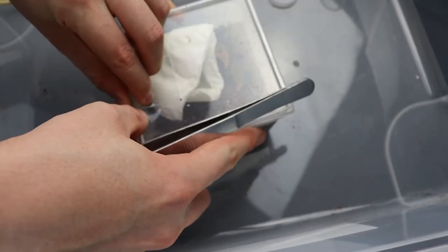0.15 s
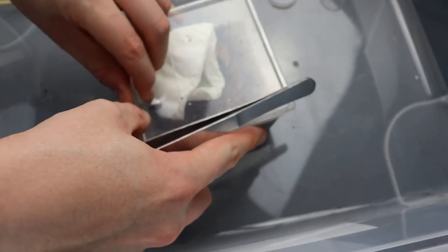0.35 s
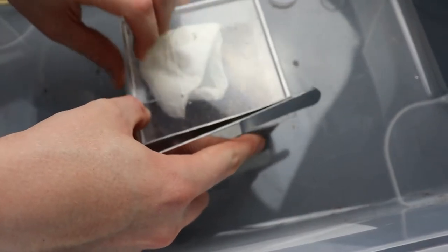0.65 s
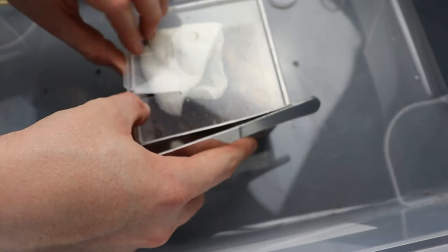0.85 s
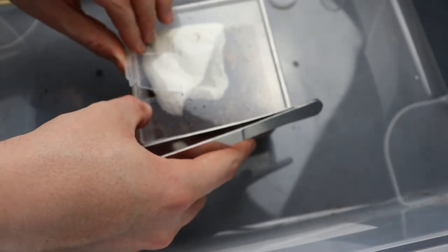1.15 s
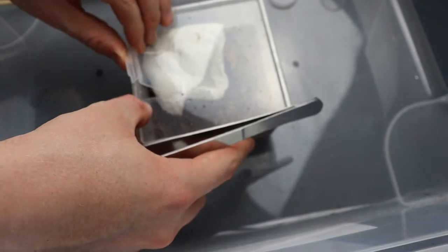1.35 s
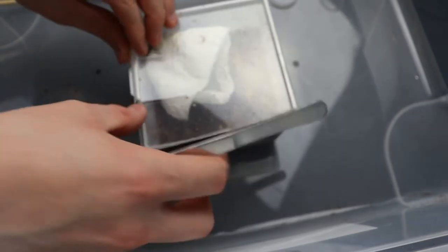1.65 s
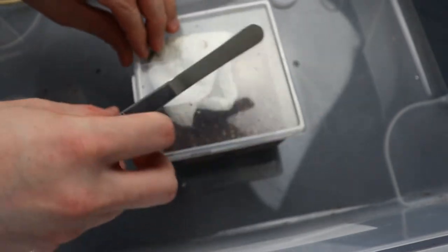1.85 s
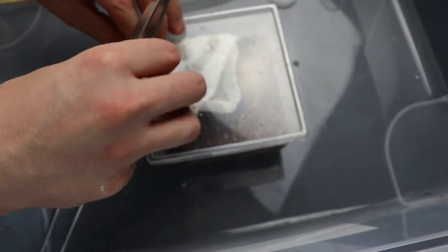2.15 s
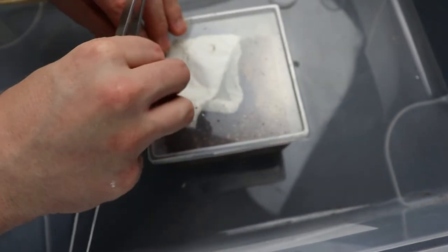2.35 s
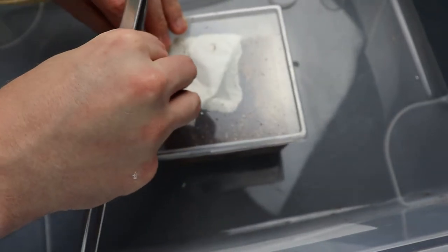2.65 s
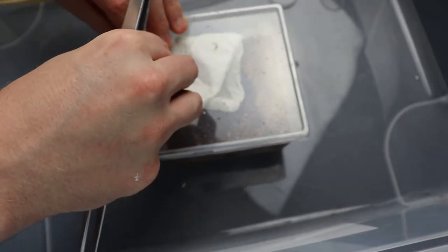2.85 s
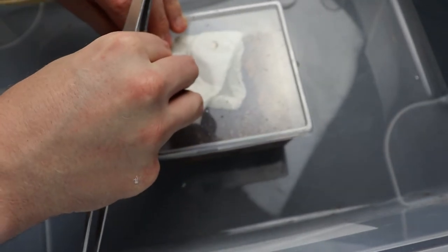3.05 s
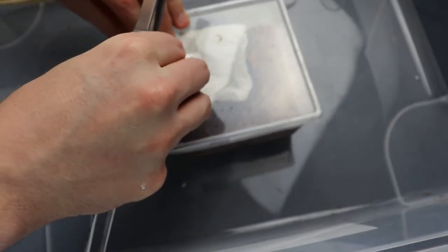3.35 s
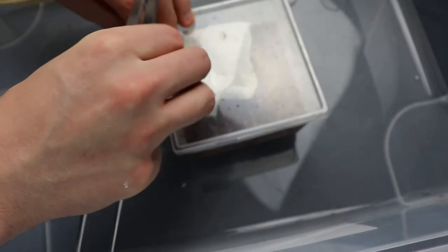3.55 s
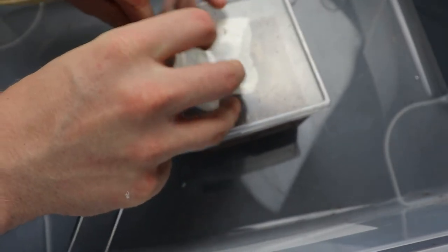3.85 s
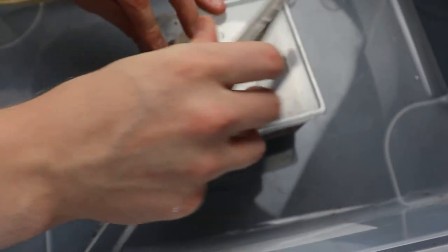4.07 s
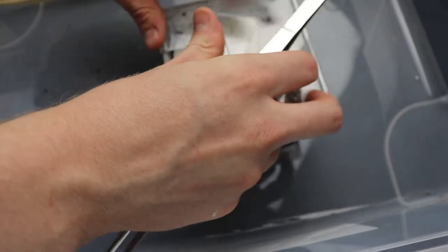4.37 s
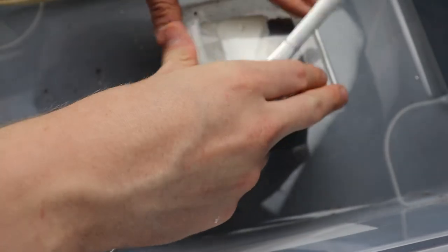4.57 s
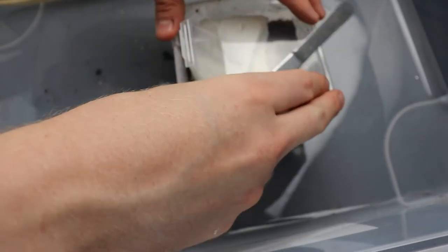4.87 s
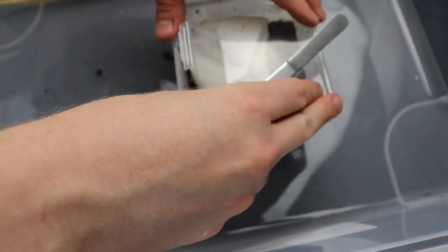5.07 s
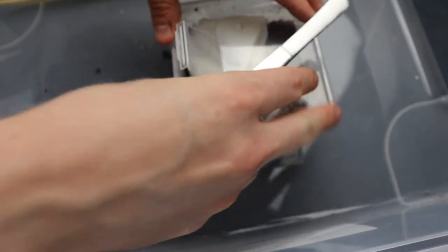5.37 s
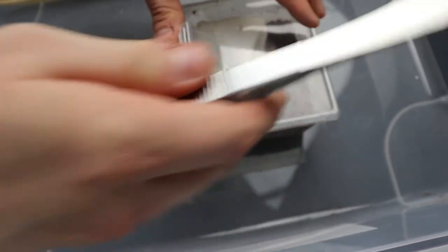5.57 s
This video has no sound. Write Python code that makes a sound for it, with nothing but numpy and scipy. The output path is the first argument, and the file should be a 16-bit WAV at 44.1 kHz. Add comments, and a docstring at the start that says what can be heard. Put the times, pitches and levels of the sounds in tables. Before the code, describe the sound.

Metal tweezers and fingers pry and snap at a small plastic box in a big plastic tub, with sharp cracks, knocks and faint rubbing.

```python
"""Quiet room, large plastic tub: fingers and steel tweezers pry and snap the lid of a small plastic box in it.
Blows are noise cracks, panel clatter and modal ringing, shaped by a colour per blow; pushes thud the tub.
Rubbing is clumped random slips through the panel modes over a rumble; scuffs are swells of coloured noise.
A lid slip swells as dense clicks; whistles are short sagging tones; floor noise lies under everything.
The two-port microphone is close and clips on the hardest blows."""
import sys
import numpy as np
from scipy import signal
from scipy.fft import rfft, irfft, next_fast_len
from scipy.io import wavfile
from scipy.ndimage import uniform_filter1d

SR = 44100
rng = np.random.default_rng(int(sys.argv[2]) if len(sys.argv) > 2 else 0)


def transcribe(u):
    """Save the signal u as a 16-bit wav file named by the first command-line argument.

    u: samples, shape (n,) or (channels, n), limited to [-1, 1]; the rate is SR.
    q: integer samples, one column per channel.
    """
    v = np.clip(np.atleast_2d(u).T, -1, 1)
    q = np.round(v * 32767).astype(np.int16)
    wavfile.write(sys.argv[1], SR, q)


def how_loud(loudness_db):
    """Turn decibels into a plain amplitude multiplier (0 dB gives 1, 20 dB gives 10)."""
    steps = np.asarray(loudness_db, float) / 20
    return 10 ** steps


N = 251811
PADDED_N = next_fast_len(N + 64, real=True)

# room and microphone noise: f/Hz, relative spectral level/dB
FLOOR_SPECTRUM = [(15, -43), (25, 4.5), (59, -11), (130, 0), (190, -8), (263, -8), (309, -18.5),
                  (575, -11.5), (734, -21), (1480, -20.5), (8590, -31.5), (13600, -30.5), (16000, -35.5)]
# left-right correlation of diffuse sound: f/Hz, correlation/1
DIFFUSE_LIKENESS = [(60, 1), (180, 0.93), (550, 0.44), (1650, 0.21), (4970, -0.42), (15000, 0.48)]
# left-right correlation of near sound: f/Hz, correlation/1
NEAR_LIKENESS = [(150, 0.99), (700, 0.78), (3000, 0.47), (9000, 0.54)]
# port balance: f/Hz, left minus right/dB
PORT_TILT = [(60, -3.5), (300, -2.5), (1000, -4), (3000, -5.5), (14000, -4.5)]
# decay of tub walls and room: f/Hz, t60/s
ROOM_T60 = [(120, 0.12), (300, 0.3), (700, 0.3), (2000, 0.18), (5000, 0.15), (13000, 0.11)]
# work of the hands on the box: t/s, level/dB
HAND_EFFORT = [(0.0, -34), (0.19, -55.5), (0.35, -64), (0.62, -50), (0.94, -44.5), (1.19, -59), (1.46, -72),
               (1.62, -55), (2.0, -63), (2.4, -54.5), (2.72, -60.5), (2.94, -65.5), (3.34, -50),
               (3.7, -57.5), (3.86, -48), (4.18, -60), (4.69, -49.5), (5.2, -63), (5.71, -49.5)]
# rubbing hiss: f/Hz, relative spectral level/dB
RUB_SPECTRUM = [(240, -33), (400, -0.5), (1510, -2), (2710, -8), (3750, -6), (6540, -9.5), (7510, -6),
                (16000, -53)]
# tub floor rumble resonances: f/Hz, width/Hz, level per pass/dB
RUMBLE_MODES = [(73.5, 40, -15.5), (114, 25, 1), (250, 290, -5.5), (328, 75, -12.5)]
# modes of box and tub: f/Hz, relative level/dB, t60/s
BODY_MODES = [(55, -19.5, 0.09), (87.5, -3.5, 0.089), (111, -13.5, 0.26), (129.6, -3.5, 0.22),
              (258.4, 2.5, 0.064), (288, 4, 0.076), (352, 3.5, 0.07), (414, -8.5, 0.2), (466.4, -7.5, 0.21),
              (562, -3, 0.066), (642.5, -2.5, 0.084), (730, -1, 0.0077), (823.5, -7, 0.11),
              (928, 0.5, 0.034), (1110, 2.5, 0.061), (1347, 5, 0.028), (1524, 7.5, 0.025),
              (1726, -3.5, 0.046), (1848, 11.5, 0.0087), (2063, -4.5, 0.028), (2380, 2, 0.01),
              (2944, -2, 0.047), (3745, 10.5, 0.0057), (5330, 7.5, 0.019), (6530, 10, 0.0087)]
# modes of the tweezers: f/Hz, relative level/dB, t60/s
STEEL_MODES = [(5350, -3, .07), (6460, -2, .08), (6840, 0, .16), (6900, -2, .14), (7330, -3, .08),
               (9280, 0, .07), (9560, -3, .08), (9960, -3, .12), (11180, -4, .06)]
# fingers scuffing the lid: t/s, length/s, level/dB, tick near 9 kHz/dB
SCUFFS_TABLE = [(0, 0.032, -40, -9), (0.442, 0.026, -45, -9), (0.557, 0.067, -55.5, -9),
                (1.072, 0.023, -50, -10.5), (1.113, 0.1, -49, -18), (1.236, .06, -53, -3),
                (1.482, 0.06, -49.5, -11), (1.553, 0.062, -48, -12), (1.631, 0.068, -53, -6),
                (1.707, 0.045, -48.5, -12), (1.748, 0.055, -48.5, -9), (2.161, 0.0406, -58.5, -30),
                (2.19, 0.023, -52.5, -3), (2.63, 0.099, -52.5, -39), (3.29, 0.13, -50.5, -3.5),
                (3.499, 0.023, -52.5, -24.5), (3.92, 0.07, -59.5, -17), (3.893, 0.036, -48.5, -12.5),
                (4.152, 0.076, -47, -6.5), (4.221, 0.026, -48, -8), (4.308, 0.046, -52, 1),
                (4.532, 0.066, -47.5, -9.5), (4.578, 0.05, -45.5, -27), (4.627, 0.034, -52.5, 4.5),
                (4.657, 0.048, -44, -33.5), (5.414, 0.022, -44.5, -3.5), (5.671, 0.032, -51.5, -7)]
# blows: t/s, relative strength/dB, knock near 600 Hz/dB, tick near 9 kHz/dB, contact decay constant/ms
BLOWS_TABLE = [(0.0406, -25, 14.5, -30.5, 13), (0.0671, -15.5, -9.5, -41.5, 1),
               (0.1427, -3.5, -1.5, -14.5, 1.5), (0.33, -11.5, -11, -22.5, 0.96),
               (0.447, -36.5, -23.5, -20, 2), (0.5377, -24.5, -8, -22.5, 2.3), (0.563, -32, -6, -27, 2.1),
               (0.6418, -34.5, 0.5, -16, 4.1), (0.7057, -5, -17.5, -22.5, 0.5),
               (0.7104, -19.5, 4, -5.5, 4.3), (0.8189, -24, -12, -28.5, 0.49), (0.837, -37, 8, -29, 0.45),
               (0.8936, -2, -7, -15, 4.5), (1.1275, -35.5, 0, -51, 2.1), (1.1527, -41, 5.5, -19, 2.9),
               (1.504, -52, -9, -16.5, 1.09), (1.5436, -35.5, -14.5, -13, 2.3),
               (1.5661, -27.5, -3, -17.5, 0.44), (1.7684, -33, -6, -18.5, 0.51),
               (1.8393, -4.5, -3, -24.5, 1.2), (1.8576, -13.5, 1.5, -33.5, 1.3),
               (1.946, -6.5, -16.5, -20, 1.1), (2.2128, -28, -6, -21, 3.2), (2.3347, -10.5, -33, -24, 0.22),
               (2.3556, -12.5, 2, -19, 4.5), (2.3835, -18, -16.5, -26, 0.72),
               (2.4692, -27.5, -8, -38.5, 5.5), (2.4915, -22.5, -29.5, -13.5, 0.89),
               (2.4999, -6.5, -18, -12, 1), (3.037, -5.5, -17.5, -15, 1.2), (3.2617, -5, -19.5, -5.5, 1.7),
               (3.285, -25.5, -14, -6.5, 2.2), (3.3987, -44, -23, -7, 1.1),
               (3.4183, -23.5, -15.5, -22.5, 3.5), (3.5331, -20, -7, -21, 0.43),
               (3.5635, -6.5, -12, -8.5, 0.73), (3.5789, -10.5, -10.5, -17.5, 4.5),
               (3.6324, -33, 1.5, -14.5, 0.98), (3.7556, -32, -5, -8, 1.5), (3.806, -48.5, -6, 0.5, 0.55),
               (3.8421, -34, -11.5, -25.5, 0.97), (3.8912, -39.5, 10.5, -19, 8),
               (4.0023, -41, -6, -32, 1.5), (4.067, -39.5, -2.5, -37, 1.5), (4.124, -42.5, -1, -22, 1),
               (4.2516, -38.5, 4, -28, 3.5), (4.2827, -50.5, 18.5, -14, 1.9), (4.3099, -31.5, 3, -39, 1.4),
               (4.33, -41.5, 7, -7.5, 1.3), (4.3892, -39, -4, -26, 1.5), (4.4172, -46, -2, -27, 1.5),
               (4.576, -27, 9, -39, 1.4), (4.6702, -24, -4, -42, 8.3), (4.8376, -35.5, -8, -41, 4.5),
               (4.985, -12.5, -6.5, -2, 0.89), (5.3129, -24, -5, -27.5, 1.28), (5.425, -39, 5.5, -7.5, 4.5),
               (5.4808, -38, 0, -3.5, 1.2), (5.503, -39, -17, -15, 1.5), (5.5359, -27.5, -1.5, -42, 0.42),
               (5.6063, -33.5, 4, -44, 1.2), (5.6855, -30.5, 2, -44, 0.77)]
# centres of thump, knock, crack, tick: f/Hz
COLOUR_HZ = [150, 600, 2500, 9000]
# answer of those four to any blow: relative level/dB
COLOUR_DB = [31.1, 14.77, 7.4, 17.26]
# dense clatter of the panels: f/Hz, t60/s
CLATTER_T60 = [(150, 0.046), (600, 0.095), (2500, 0.044), (9000, 0.027)]
# box pushed down on the tub floor: t/s, peak level/dB, push/ms
THUDS_TABLE = [(0.042, -25.5, 1.7), (0.07, -36, 3.4), (.709, -22.5, 3.24), (0.896, -29, 2.6),
               (1.84, -21, 2.5), (1.847, -25.5, 4.7), (1.859, -22, 2.94), (2.355, -22, 4.9),
               (2.359, -31, 2.2), (2.386, -31.5, 5.3), (3.26, -44, 9.3), (3.535, -42.5, 1.6),
               (3.757, -37, 3), (3.845, -37, 2.6), (3.893, -38, 3.6), (4.285, -39, 4.3), (4.504, -43, 4.1),
               (4.569, -30, 11.4), (4.674, -34.5, 3.2), (4.741, -37.5, 3.7), (4.829, -38.5, 5.9),
               (4.99, -20, 0.98), (5.312, -32, 5.2), (5.428, -42, 3.2), (5.539, -36, 4.6),
               (5.609, -39, 6.5), (5.685, -48, 2.2)]
# lid edge resonances: f/Hz, width/Hz, level per pass/dB
SLIP_MODES = [(2640, 1500, 0.5), (4630, 2200, -13.5), (7250, 6000, -4)]
# faint whistles: t/s, length/s, starting f/Hz, peak level/dB
WHISTLES_TABLE = [(1.34, .035, 5000, -60), (1.375, .025, 4900, -61), (1.412, .035, 4200, -55),
                  (2.105, .03, 5300, -61), (2.17, .03, 4200, -58), (3.91, .085, 1570, -58),
                  (3.985, .035, 4350, -63)]


def evened(x):
    """Scales to rms 1."""
    return x / np.sqrt(np.mean(x ** 2) + 1e-20)


def smooth_noise(size, span):
    """Moving average of white noise, at rms 1."""
    return evened(uniform_filter1d(rng.standard_normal(size), span))


def read(points, hz):
    """Interpolates a table on a log-frequency axis."""
    f, value = np.transpose(points)
    return np.interp(np.log(hz + 1), np.log(f + 1), value)


def coloured(x, points):
    """Filters by a spectrum in dB."""
    size = next_fast_len(x.shape[-1], real=True)
    gain = how_loud(read(points, np.fft.rfftfreq(size, 1 / SR)))
    return irfft(rfft(x, size) * gain, size)[..., :x.shape[-1]]


def paired(size, points):
    """Two noises, correlated by frequency as the table says."""
    a, b = rfft(rng.standard_normal((2, size)))
    same = np.clip(read(points, np.fft.rfftfreq(size, 1 / SR)), -1, 1)
    return irfft(np.array([a, same * a + np.sqrt(1 - same ** 2) * b]), size)


def resonate(x, modes):
    """Sum of parallel two-pole resonances."""
    out = np.zeros_like(x)
    for hz, width_hz, db in modes:
        b, a = signal.iirpeak(hz, hz / width_hz, SR)
        out += how_loud(db) * signal.lfilter(b, a, x)
    return out


def ringing(modes, t):
    """One exponentially dying sine per mode."""
    hz, db, t60_s = np.transpose(modes)[:, :, None]
    return how_loud(db - 60 * t / t60_s) * np.sin(2 * np.pi * hz * t)


def decaying(noise, *layers):
    """Decays each noise band by summed power layers: (t60 table, level/dB, build-up/s)."""
    hz, t, z = signal.stft(noise, SR, nperseg=128)
    power = 0
    for t60s, db, build_s in layers:
        fall = how_loud(2 * db - 120 * t / read(t60s, hz)[:, None])
        power = power + fall * (1 - np.exp(-t / build_s)) ** 2
    return signal.istft(z * np.sqrt(power), SR, nperseg=128)[1][:, :noise.shape[1]]


def floor():
    """Room tone and microphone hiss: coloured noise, most alike in both ports in the bass."""
    level_db = -53.5
    noise = coloured(paired(PADDED_N, DIFFUSE_LIKENESS), FLOOR_SPECTRUM)
    return how_loud(level_db) * evened(noise)[:, :N]


def rubbing():
    """Clumped slips of skin on plastic ring the panels; the tub floor rumbles with the same effort."""
    hiss_db, hiss_share, mean_effort_db = -64.5, 0.77, -55
    slips_per_s = 5000
    clumps = how_loud(6.6 * smooth_noise(N, 700))
    slips = (rng.random(N) < slips_per_s / SR) * rng.standard_normal(N)
    slips = slips * how_loud(1.4 * rng.exponential(1, N)) * clumps
    # width 7 / t60: broader than the freely ringing mode
    panel_modes = [(hz, 7 / t60_s, db) for hz, db, t60_s in BODY_MODES if hz > 400]
    panels = resonate(slips, panel_modes)
    hiss = evened(coloured(evened(slips) + 0.17 * evened(panels), RUB_SPECTRUM))

    t_s, level_db = np.transpose(HAND_EFFORT)
    effort_db = np.interp(np.arange(N) / SR, t_s, level_db)
    lumpy = rng.standard_normal(N) * how_loud(4.5 * smooth_noise(N, 900))
    rumble = evened(resonate(resonate(lumpy, RUMBLE_MODES), RUMBLE_MODES))
    # hiss follows the hands by its share only
    hiss_level_db = hiss_db + hiss_share * (effort_db - mean_effort_db)
    return hiss * how_loud(hiss_level_db) + rumble * how_loud(effort_db)


def room(x):
    """Tub walls and room: convolves the steady sounds with a decaying noise tail."""
    level_db, build_s = -9.5, 0.003
    tail = decaying(paired(10240, DIFFUSE_LIKENESS), (ROOM_T60, 0, build_s))
    tail = tail / np.linalg.norm(tail[0])
    return how_loud(level_db) * signal.fftconvolve(x[None], tail, axes=1)[:, :N]


def scuffs():
    """Fingers scuff the lid: soft swells of grainy coloured noise."""
    out = np.zeros((2, N + 8192))
    for start_s, length_s, db, tick_db in SCUFFS_TABLE:
        size = 2 * round(length_s * SR / 2)
        grain = how_loud(2.5 * smooth_noise(8192, 150))[:size]
        colour = [(150, 14), (600, 1.5), (2500, 0), (9000, tick_db), (16000, tick_db - 3)]
        noise = evened(coloured(paired(8192, NEAR_LIKENESS), colour))[:, :size]
        swell = signal.windows.tukey(size, 0.7)
        out[:, round(start_s * SR):][:, :size] += how_loud(db) * noise * grain * swell
    return out[:, :N]


def blow_filter(thump_db, knock_db, tick_db, hz):
    """Minimum-phase colour of one blow: nothing sounds before the contact."""
    centres = zip(COLOUR_HZ, np.add(COLOUR_DB, [thump_db, knock_db, 0, tick_db]))
    colour = [(40, thump_db), *centres, (16000, tick_db + 10.5)]
    log_gain = np.log(how_loud(read(colour, hz)))
    # each spot on the box has its own broad colour
    humps = uniform_filter1d(uniform_filter1d(rng.standard_normal(len(hz)), 160), 160)
    log_gain += 0.18 * evened(humps)
    circle = np.concatenate([log_gain, log_gain[-2:0:-1]])
    return np.exp(np.conj(signal.hilbert(circle)))[:len(hz)]


def blows():
    """A contact cracks, clatters through the panels, rings the modes and dies away in tub and room."""
    ring_db, steel_db, crack_db, clatter_db, tail_db = -10.5, -14, 10, 3, -10.5
    size, crack_size = 10240, 2048
    out = np.zeros((2, N + size))
    t, hz = np.arange(size) / SR, np.fft.rfftfreq(size, 1 / SR)
    crack_t = t[:crack_size]
    body, steel = ringing(BODY_MODES, t), ringing(STEEL_MODES, t)
    # the low tub floor answers steadily, small panels by the spot struck
    fickle = np.clip(np.transpose(BODY_MODES)[0] / 400, 0, 1)
    for start_s, db, knock_db, tick_db, contact_ms in BLOWS_TABLE:
        # dull and light blows put the larger share into the tub
        thump_db = -30 + 0.97 * knock_db - 0.39 * db

        place = rng.uniform(-0.67, 1, len(BODY_MODES))
        grip = rng.uniform(-0.56, 1, len(STEEL_MODES))
        answer = 1 - fickle + fickle * np.sign(place) * (0.28 + abs(place))
        ring = how_loud(ring_db) * answer @ body
        ring += how_loud(steel_db + 0.6 * tick_db) * grip @ steel  # bright blows are steel on the rim

        rise_s = 0.00006 * how_loud(-0.6 * db)  # light touches are fingertips and set in slowly
        shape = (1 - np.exp(-crack_t / rise_s)) * np.exp(-crack_t * 1000 / max(contact_ms, 0.1))
        crack = np.zeros((2, size))
        crack[:, :crack_size] = how_loud(crack_db) * paired(crack_size, NEAR_LIKENESS) * shape
        crack[:, 0] -= 2.6 * how_loud(0.23 * db)  # one sharp push, larger in hard blows

        clatter = decaying(paired(size, NEAR_LIKENESS),
                           (CLATTER_T60, clatter_db, 0.0008), (ROOM_T60, tail_db, 0.007))
        causal = blow_filter(thump_db, knock_db, tick_db, hz)
        sound = rfft(ring + crack + clatter) * causal
        # the blow's energy is set, its detail is chance
        sound *= np.linalg.norm(causal) / np.linalg.norm(sound[0])
        out[:, round(start_s * SR):][:, :size] += how_loud(db + 16.5) * irfft(sound, size)
    return out[:, :N]


def thuds():
    """A soft sine-squared push rings the body modes from below; longer pushes favour the lowest."""
    out = np.zeros(N + 12000)
    signs = (-1.) ** np.arange(len(BODY_MODES))  # neighbours swing opposite
    answer = signs @ ringing(BODY_MODES, np.arange(11000) / SR)
    for start_s, db, push_ms in THUDS_TABLE:
        push_size = max(round(push_ms * SR / 1000), 3)
        push = np.sin(np.linspace(0, np.pi, push_size)) ** 2
        sound = signal.fftconvolve(answer, push)
        out[round(start_s * SR):][:len(sound)] += how_loud(db) * sound / np.abs(sound).max()
    return out[:N]


def slip():
    """Dense stick-slip clicks swell as the lid edge slides out of its catch, and stop as it comes free."""
    start_s, free_s, onset_s = 0.664, 0.706, 0.008
    peak_db, swell_db_per_s, fall_db_per_s = -28, 306.5, 1402
    clicks_per_s = 5000
    clicks = (rng.random(N) < clicks_per_s / SR) * rng.standard_normal(N)
    t = np.arange(N) / SR
    level_db = peak_db + np.minimum(swell_db_per_s * (t - free_s), -fall_db_per_s * (t - free_s))
    onset = np.clip((t - start_s) / onset_s, 0, 1)
    edge = evened(resonate(resonate(clicks, SLIP_MODES), SLIP_MODES))
    return edge * onset * how_loud(level_db)


def whistles():
    """Short sines, fuzzy by random phase, sagging a little in pitch."""
    out = np.zeros(N)
    for start_s, length_s, hz, db in WHISTLES_TABLE:
        t = np.arange(0, length_s, 1 / SR)
        waver = np.cumsum(rng.standard_normal(len(t))) * 0.035
        tone = np.sin(2 * np.pi * hz * t * (1 - 0.39 * t) + waver)
        out[round(start_s * SR):][:len(t)] += how_loud(db) * np.hanning(len(t)) * tone
    return out


def scene():
    """Sums the layers; sound reaches the left port first but is louder in the right."""
    left_lead_s = 50e-6
    steady = rubbing() + slip() + whistles() + thuds()
    mix = blows() + scuffs() + steady + room(steady) + floor()
    left, right = rfft(mix, PADDED_N)
    hz = np.fft.rfftfreq(PADDED_N, 1 / SR)
    tilt = how_loud(read(PORT_TILT, hz) / 2)
    delay = np.exp(-2j * np.pi * hz * left_lead_s)
    return irfft(np.array([left * tilt, right / tilt * delay]), PADDED_N)[:, :N]


def low_pass(x):
    """Removes everything above the highest recorded frequency."""
    return signal.sosfilt(signal.butter(12, 16440, fs=SR, output="sos"), x)


def record(dry):
    """Microphone: bass cut, hard overload, band limit."""
    bass_cut = signal.butter(2, 45, "high", fs=SR, output="sos")  # the capsule loses deep bass
    band_limit = signal.firwin(255, 16300, window=("kaiser", 7), fs=SR)
    overloaded = np.clip(signal.sosfilt(bass_cut, dry), -1, 1)
    mix = signal.oaconvolve(overloaded, band_limit[None], "same", axes=1)
    return low_pass(mix)


dry = scene()
out = record(dry)
transcribe(out)
```